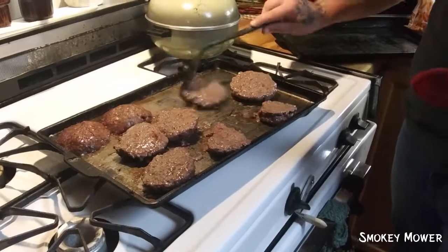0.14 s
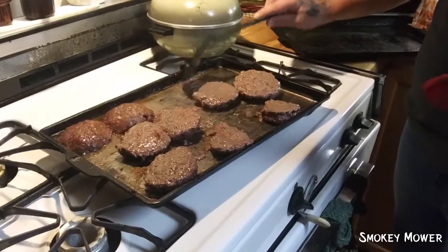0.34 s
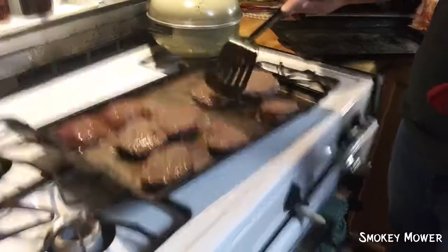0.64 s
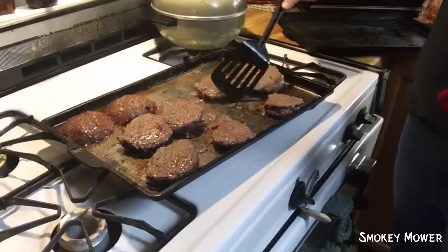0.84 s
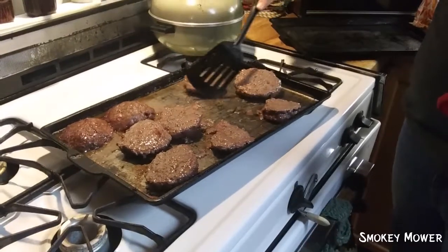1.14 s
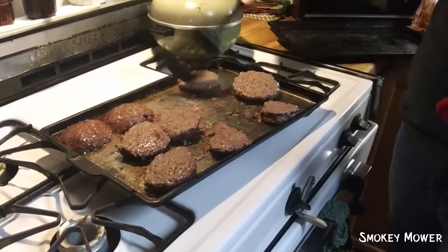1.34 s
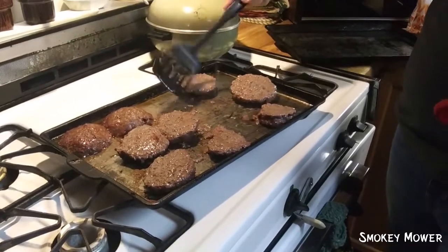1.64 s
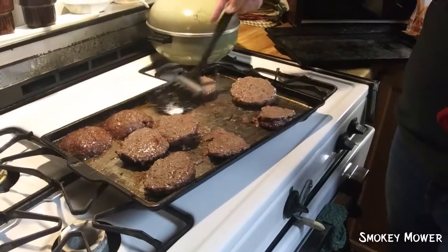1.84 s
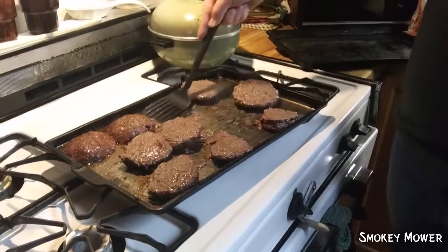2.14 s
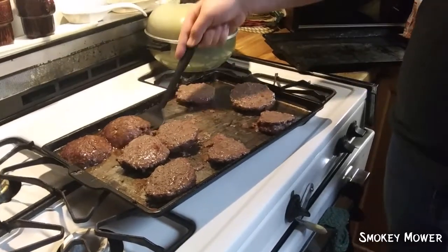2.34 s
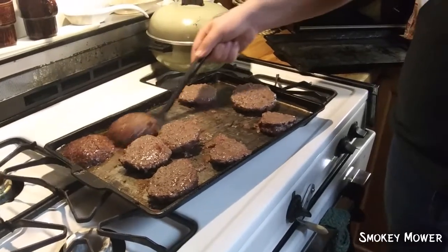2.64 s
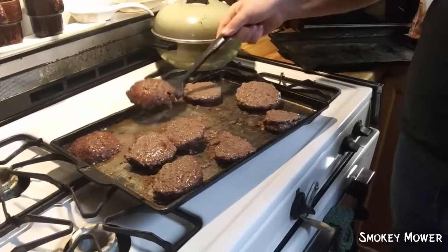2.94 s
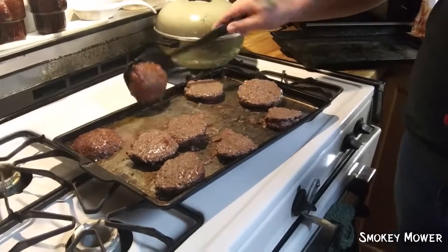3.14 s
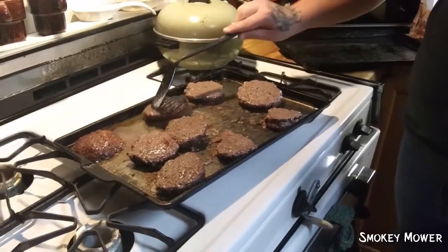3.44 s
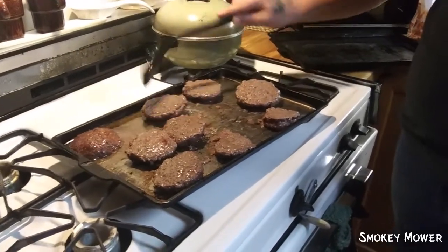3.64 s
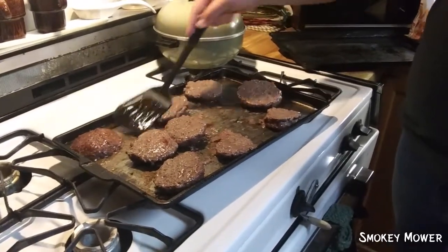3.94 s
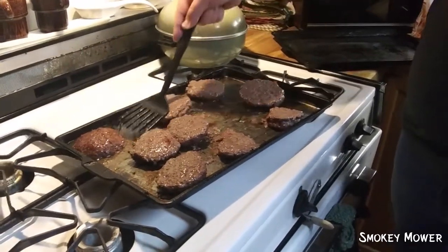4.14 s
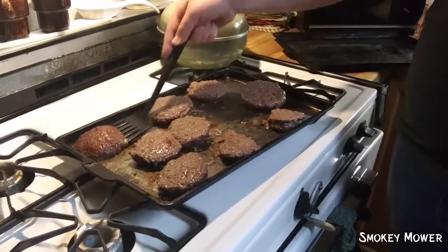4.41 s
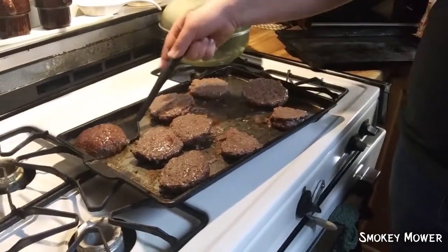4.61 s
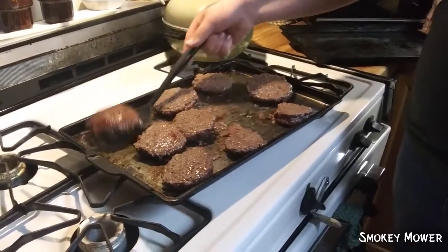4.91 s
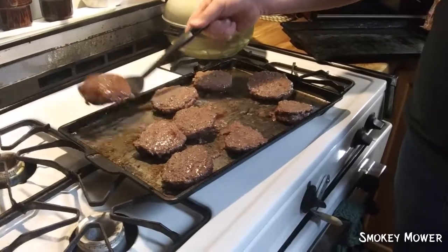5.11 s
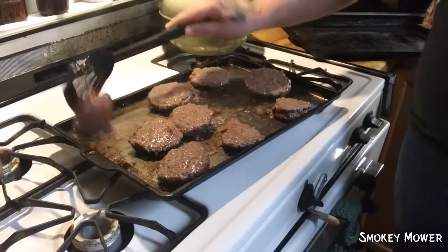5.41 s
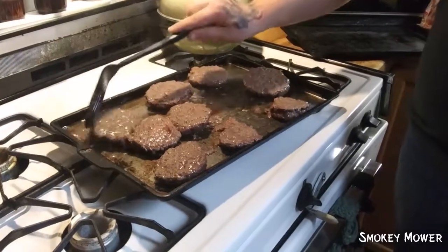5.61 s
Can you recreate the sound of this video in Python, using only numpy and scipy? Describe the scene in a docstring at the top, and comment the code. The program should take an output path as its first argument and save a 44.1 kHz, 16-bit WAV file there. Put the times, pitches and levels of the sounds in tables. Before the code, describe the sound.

A metal spatula clacks sharply on a thin baking sheet, with short scrapes and soft meaty plops over faint sizzle and a low burner murmur.

```python
"""Turning patties on a stove-top sheet

Patties are turned on a baking sheet that lies across the burners of a gas stove in a small kitchen.
Flames murmur as coloured noise with faint whistles; fat sizzles as grains of steam; meat lands dully.
A spatula slides as dense slips, ticks with its edge as bright snaps, and clacks the sheet's modes into ringing."""
import sys
import numpy as np
from scipy import signal
from scipy.fft import rfft, irfft, next_fast_len
from scipy.io import wavfile

SR = 44100
rng = np.random.default_rng(int(sys.argv[2]) if len(sys.argv) > 2 else 0)


def unload_audio(sound):
    """Save the sound as a 16-bit wav file, at the path given as the first command line argument."""
    columns = np.transpose(np.atleast_2d(sound))
    # keep every value between -1 and 1, then stretch to whole-number steps
    steps = np.round(np.clip(columns, -1, 1) * 32767)
    wavfile.write(sys.argv[1], SR, steps.astype(np.int16))


N = 254360
RING_COUNT = int(.6 * SR)  # samples in every ring and echo


def from_db(db):
    """Decibels to gain."""
    return 10 ** (np.asarray(db) / 20)


def rms_one(x):
    """Scale to rms 1."""
    return x / np.sqrt(np.mean(x ** 2) + 1e-20)


def attack_one(x):
    """Scale a ring so that its first 25 ms have rms 1."""
    return x / np.sqrt(np.mean(x[:SR // 40] ** 2) + 1e-20)


def at_hz(points, hz, axis=1):
    """Read a column of a table along log frequency."""
    table = np.array(points)
    return np.interp(np.log(np.maximum(hz, 1)), np.log(table[:, 0]), table[:, axis])


def ring_time():
    """Time axis of a ring, in seconds."""
    return np.arange(RING_COUNT) / SR


def fade(t60):
    """Free decay, 60 dB in t60 seconds."""
    return np.exp(-np.log(1000) * ring_time() / t60)


def butter(x, hz, kind, order=2):
    """Causal low- or high-pass."""
    sections = signal.butter(order, np.clip(hz, 10, .45 * SR), kind, fs=SR, output="sos")
    return signal.sosfilt(sections, x)


def noise(spectrum, size):
    """Noise of a given colour, rms 1: shaped magnitudes with random phases."""
    padded = next_fast_len(size)
    hz = np.fft.rfftfreq(padded, 1 / SR)
    phases = np.exp(2j * np.pi * rng.random(len(hz)))
    return rms_one(irfft(from_db(at_hz(spectrum, hz)) * phases, padded)[:size])


def add(out, s, sound):
    """Mix a sound in at a time."""
    start = int(s * SR)
    out[start:start + len(sound)] += sound[:len(out) - start]


def grains(per_s):
    """Random clicks of uneven size and either sign, rms 1."""
    sizes = from_db(3 * np.minimum(rng.exponential(1, N), 4)) * rng.choice([-1, 1], N)
    return rms_one(sizes * (rng.random(N) < per_s / SR))


def shake(force, body):
    """Drive a body's ring with a force, keeping the force's level."""
    return signal.fftconvolve(force, body / np.linalg.norm(body))[:N]


def ringing(modes, build_cycles):
    """Each contact feeds the modes a little differently; low modes take longer to build up."""
    t = ring_time()
    ring = np.zeros(RING_COUNT)
    for hz, db, t60 in modes:
        build = 1 - np.exp(-t * hz / build_cycles)
        tone = np.sin(2 * np.pi * (hz * t + rng.random()))
        ring += from_db(db + rng.normal()) * fade(t60) * build * tone
    return attack_one(ring)


# Flame noise colour: pitch_hz, level_db (per Hz)
FLAME_COLOUR = [(30, -36), (135, -28.5), (172, -32.5), (212, -9.5), (270, -11.5), (350, -10), (415, -3),
                (500, -5.5), (750, -1.5), (1020, -4), (1350, -8), (2800, -16), (7000, -23), (15500, -27)]
# Faint stove whistles: pitch_hz (centre), level_db
STOVE_TONES = [(215, -82), (415, -78), (743, -74.5), (1017, -75), (5803, -87)]


def burners(wander_hz, flame_db):
    """Steady flame noise with a few faint whistles, whose pitch wanders a little."""
    slow = [(8, 0), (60, -50)]  # colour of the wander: pitch_hz, level_db
    tones = np.zeros(N)
    for hz, db in STOVE_TONES:
        wandering = hz + wander_hz * noise(slow, N)
        tones += from_db(db) * rms_one(np.sin(2 * np.pi * np.cumsum(wandering) / SR))
    return from_db(flame_db) * noise(FLAME_COLOUR, N) + tones


MEAT_CONTACT_S = 0.025  # half length of a landing or a squelch, to 1/e of its gain


def swells(rows):
    """Smooth bumps of gain as meat meets metal, from rows of centre_s, level_db."""
    out = np.zeros(N)
    t = np.arange(-RING_COUNT // 4, RING_COUNT // 4) / SR
    for s, db in rows:
        add(out, s + t[0], from_db(db) * np.exp(-(t / MEAT_CONTACT_S) ** 2))
    return out


# The blade glides up to a patty or is pushed under it:
# full_s (full pressure begins), level_db, attack_s, release_s
SLIDES = [(2.228, -50.5, 0.052, 0.024), (2.252, -42, 0.012, 0.12), (4.471, -51.5, 0.15, 0.13)]
# Full pressure holds for SLIDE_HOLD_S; attack and release each change it by SLIDE_SWING_DB
SLIDE_HOLD_S, SLIDE_SWING_DB = .03, 19


def blade_pressure():
    """Each push swells, holds and lets go; as gain."""
    t, pressure = np.arange(N) / SR, np.zeros(N)
    for s, db, attack, release in SLIDES:
        before = np.maximum(s - t, 0) / attack
        after = np.maximum(t - s - SLIDE_HOLD_S, 0) / release
        swings = before + after
        touching = swings < 3
        pressure[touching] += from_db(db - SLIDE_SWING_DB * swings[touching])
    return pressure


# A patty shifts or peels off the hot metal: centre_s, level_db
SQUELCHES = [(1.437, -69.5), (2.68, -66), (3.62, -65), (4.825, -62)]
# A flipped patty lands, heard in the fat and in plops(): centre_s, level_db
PLOPS = [(0.248, -45.5), (3.44, -51.5), (5.593, -46)]
# Colour of one burst of steam: pitch_hz, level_db (per Hz)
SIZZLE_COLOUR = [(500, -2), (1500, 20), (3000, -3), (5000, 3.5), (8000, -23), (11000, -32), (15000, -35)]
# Steam under a landing patty and a sliding blade, relative to each; time constant of stirred fat
LANDING_STEAM_DB, SLIDE_STEAM_DB, FAT_SETTLES_S = -8, -13.5, 0.16


def fat(simmer_db, pop_t60):
    """Tiny bursts of steam, swelling where wet meat meets hot metal and lingering behind the blade."""
    keep = np.exp(-1 / (FAT_SETTLES_S * SR))
    stirred = signal.lfilter([1 - keep], [1, -keep], blade_pressure())
    steam = from_db(simmer_db) + swells(SQUELCHES)
    steam += from_db(LANDING_STEAM_DB) * swells(PLOPS)
    steam += from_db(SLIDE_STEAM_DB) * stirred
    return shake(steam * grains(per_s=2000), noise(SIZZLE_COLOUR, RING_COUNT) * fade(pop_t60))


# The sheet's crowd of weaker modes: pitch_hz, level_db (per Hz), t60_s
SHEET_WASH = [(147, -18.5, 1), (216, -11, 0.61), (393, -6.5, 0.57), (750, -4, 0.47), (1070, 7, 0.32),
              (1400, 3, 0.28), (1830, 8, 0.2), (3440, -6, 0.38), (5000, -4, 0.18), (6900, -11.5, 0.31),
              (7870, -6, 0.17), (9800, -12, 0.24), (15000, -22, 0.38)]


def sheet_wash():
    """Crowded plate modes, each half-octave region dying at its own rate."""
    hz = np.fft.rfftfreq(RING_COUNT, 1 / SR)
    crowd = rfft(noise([row[:2] for row in SHEET_WASH], RING_COUNT))
    region = np.round(2 * np.log2(np.maximum(hz, 100)))
    wash = np.zeros(RING_COUNT)
    for k in np.unique(region):
        t60 = at_hz(SHEET_WASH, 2 ** (k / 2), axis=2)
        wash += irfft(crowd * (region == k), RING_COUNT) * fade(t60)
    return attack_one(wash)


def plops(soft_hz, damped_t60):
    """Soft meat meets the sheet bit by bit and stirs it dully."""
    dull_sheet = butter(sheet_wash() * fade(damped_t60), soft_hz, "low", order=1)
    return shake(swells(PLOPS) * grains(per_s=1700), dull_sheet)


# Colour of the rubbing edge: pitch_hz, level_db (per Hz)
SCRAPE_COLOUR = [(120, -74), (210, -33), (450, -4), (850, 7.5), (1300, 2.5), (1750, 6), (2500, -1.5),
                 (3300, -1.5), (5000, -8.5), (7000, -15.5), (10000, -31), (15000, -65)]
# Resonances that sing under the sliding edge: pitch_hz, level_db, t60_s
RASP_MODES = [(950, -4, 0.2), (1142, 0, 0.13), (1560, -12, 0.074), (2280, -21, .1), (3070, 5, 0.033),
              (4700, -7, 0.025)]


def slides(modes_db, ring_t60):
    """The edge catches on baked-on crust: dense tiny slips shake the sheet, which the blade damps."""
    pressure = blade_pressure()
    rub = np.zeros(N)
    for spot in range(3):  # both corners and the middle of the edge rub on spots of their own
        rub += shake(pressure * grains(per_s=700), noise(SCRAPE_COLOUR, RING_COUNT) * fade(ring_t60))
    # only a firmly pressed edge makes the sheet sing
    firm = pressure * np.sqrt(pressure / pressure.max())
    rasp = shake(firm * grains(per_s=760), ringing(RASP_MODES, build_cycles=0.33))
    return rub / np.sqrt(3) + from_db(modes_db) * rasp


# Light touches of the blade's edge: start_s, level_db (of the snap), centre_hz
TICKS = [(0.219, -55.5, 6800), (0.2417, -52.5, 3660), (0.2787, -55.5, 6300), (1.8794, -44, 3260),
         (1.94, -52.5, 3000), (1.9737, -50.5, 2290), (3.595, -66, 6900), (4.814, -69, 5500),
         (5.459, -64.5, 4300), (5.653, -60, 2500)]
# The blade, held against the sheet: pitch_hz, level_db, t60_s
BLADE_MODES = [(410, -12.5, .12), (1212, 5, 0.029), (1535, -10.5, 0.1), (1742, 3.5, 0.043), (2940, -2, .04),
               (3750, -30, .07), (6200, -26, .07)]
# Snap's half width at -3 dB; centre where the blade rings as loud as the snap; ring lost above it
SNAP_OCTAVES, FULL_RING_HZ, RING_LOSS_DB_PER_OCTAVE = 0.59, 2960, 6


def ticks(snap_t60, tail_db, tail_t60, top_hz, sheet_db, sheet_t60):
    """A bright snap with a weak tail; a duller touch rings the blade and the pressed sheet more."""
    out, hz = np.zeros(N), np.geomspace(100, 16000, 30)
    dull_wash = butter(sheet_wash(), 1300, "low")
    pressed_sheet = from_db(sheet_db) * attack_one(dull_wash * fade(sheet_t60))
    snap_decay = fade(snap_t60) + from_db(tail_db) * fade(tail_t60)
    for s, db, centre_hz in TICKS:
        colour_db = -10 * np.log10(1 + (np.log2(hz / centre_hz) / SNAP_OCTAVES) ** 4)
        snap = noise(np.column_stack([hz, colour_db]), RING_COUNT) * snap_decay
        ring_db = -RING_LOSS_DB_PER_OCTAVE * np.log2(centre_hz / FULL_RING_HZ)
        ring = from_db(ring_db) * (ringing(BLADE_MODES, build_cycles=1.0) + pressed_sheet)
        add(out, s, from_db(db) * (attack_one(butter(snap, top_hz, "low")) + ring))
    return out


def bending_wave(start_hz, spread_s, t60):
    """Short waves cross the sheet faster than long ones, so the first arrival falls quickly in pitch."""
    hz = start_hz / np.sqrt(1 + ring_time() / spread_s)
    return attack_one(np.sin(2 * np.pi * np.cumsum(hz) / SR) * fade(t60))


# Blows on the sheet: start_s, level_db, hardness_hz (low-pass of the contact),
# crack_db (before that low-pass), damping_db_per_s (by the meat)
BLOWS = [(0.144, -24, 5000, 0, 27), (1.9725, -41.5, 1400, -17, 6), (3.294, -25.5, 4700, 1.5, 17),
         (3.4696, -40, 1940, -1.5, 39), (4.0128, -39.5, 1980, -2, 54), (4.2328, -53, 1580, -14, 35),
         (4.665, -54.5, 1400, -9, 42), (5.4771, -18.5, 5700, 0, 13)]
# The sheet's clear modes: pitch_hz, level_db, t60_s (before the meat's damping)
SHEET_MODES = [(283.5, -10, 0.16), (393, -19, 0.44), (530.5, -15.5, 0.29), (593, -30, 0.82),
               (709, -9.5, 0.41), (813, -17, 0.3), (946.6, 1, 0.24), (992, 5.5, 0.12), (1115, 3.5, 0.049),
               (1110, -5, 0.28), (1117, 0, 0.14), (1190, -31, 0.27), (1289, -6, 0.2), (1320, -46, 0.31),
               (1455, -11, 0.1), (1674, 6.5, 0.1), (1845, -19, 0.22), (1952, -7.5, 0.2), (2063, -8.5, 0.26),
               (2080, -21, 0.14), (2304, 6.5, 0.049), (2450, -19.5, 0.21), (2700, -36, 0.41),
               (3000, -11.5, 0.26), (4300, -25, .18), (4870, -13.5, 0.13), (5150, -12, .25),
               (5360, -43, 0.18), (7400, -18.5, 0.29), (7800, -18, 0.16)]
# Colour of the crack: pitch_hz, level_db (per Hz)
CRACK_COLOUR = [(200, -41), (500, -18.5), (1100, -21.5), (1900, 5), (2500, -2), (3500, -13.5), (5500, -13),
                (9000, -28.5), (15000, -22)]
# A gentler blow stays longer on the sheet and rings it lower:
# blow level of an even ring, bass gained per dB below it
EVEN_RING_DB, BASS_PER_SOFT_DB = -22, 0.38
BENDING_WAVE_DB = -7.5  # beside the clear modes of the ring


def blows(wash_db, crack_t60, low_hz, rise_s):
    """A crack and a bending wave, then the ringing sheet; meat softens the contact and damps the ring."""
    out, t = np.zeros(N), ring_time()
    for s, db, hard_hz, crack_db, damping in BLOWS:
        crack = from_db(crack_db) * attack_one(noise(CRACK_COLOUR, RING_COUNT) * fade(crack_t60))
        wave = from_db(BENDING_WAVE_DB) * bending_wave(start_hz=2623, spread_s=.003, t60=0.088)
        ring = ringing(SHEET_MODES, build_cycles=1.8) + from_db(wash_db) * sheet_wash()
        low_db = BASS_PER_SOFT_DB * (EVEN_RING_DB - db)
        ring = ring + (from_db(low_db) - 1) * butter(ring, low_hz, "low", order=1)
        damped_ring = ring * from_db(-damping * t)
        blow = (crack + wave + damped_ring) * (1 - np.exp(-t / rise_s))
        add(out, s, from_db(db) * attack_one(butter(blow, hard_hz, "low")))
    return out


def kitchen(x, wet_db, t60, wall_hz, build_s):
    """Diffuse reflections gather after the direct sound and die away, dulled by the walls."""
    build = 1 - np.exp(-(ring_time() / build_s) ** 2)
    dulled = butter(rng.standard_normal(RING_COUNT), wall_hz, "low", order=1)
    return x + from_db(wet_db) * shake(x, dulled * fade(t60) * build)


def scene():
    """Spatula, meat and fat in the kitchen, over the burners."""
    flames = burners(wander_hz=6.08, flame_db=-63)
    meat = fat(simmer_db=-77.5, pop_t60=0.0019) + plops(soft_hz=1470, damped_t60=0.32)
    scrapes = slides(modes_db=-4.0, ring_t60=0.081)
    touches = ticks(snap_t60=.026, tail_db=-20, tail_t60=0.36, top_hz=7600, sheet_db=-1.0, sheet_t60=0.64)
    clacks = blows(wash_db=-1.5, crack_t60=0.043, low_hz=330, rise_s=0.00016)
    from_sheet = kitchen(clacks + scrapes + meat, wet_db=-16.5, t60=0.29, wall_hz=5000, build_s=0.0094)
    # the tilted blade throws more of its sound at the walls
    from_blade = kitchen(touches, wet_db=-14, t60=0.41, wall_hz=3000, build_s=0.0056)
    radiated = butter(from_sheet + from_blade, 216, "high", order=4)  # thin metal radiates little bass
    return (radiated + flames)[None]


def record(dry):
    """The microphone sheds the deep bass, and the top is cut steeply above 15.8 kHz."""
    thin = butter(dry, 28, "high")
    return signal.sosfilt(signal.ellip(10, .1, 70, 15800, fs=SR, output="sos"), thin)


dry = scene()
out = record(dry)
unload_audio(out)
```